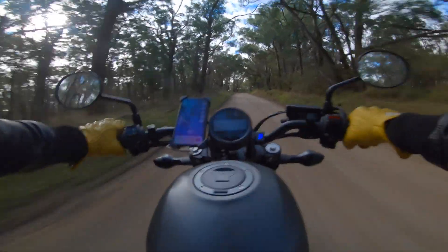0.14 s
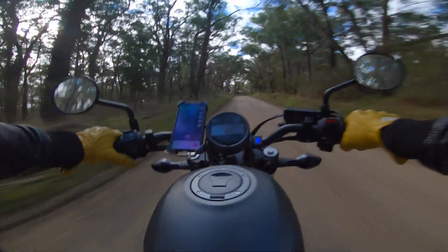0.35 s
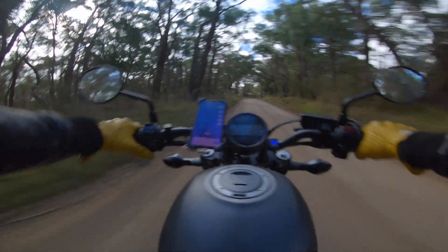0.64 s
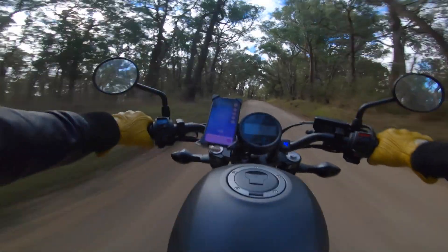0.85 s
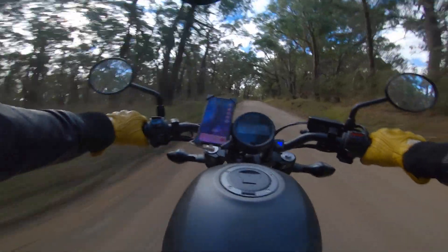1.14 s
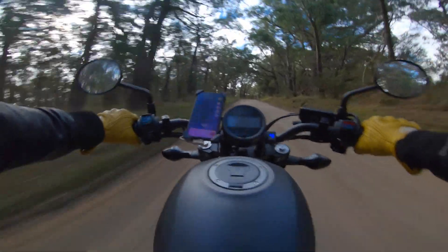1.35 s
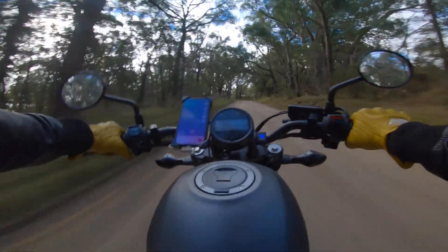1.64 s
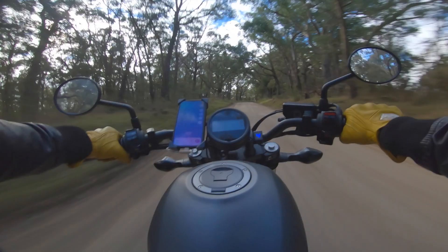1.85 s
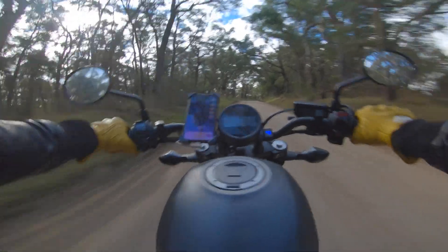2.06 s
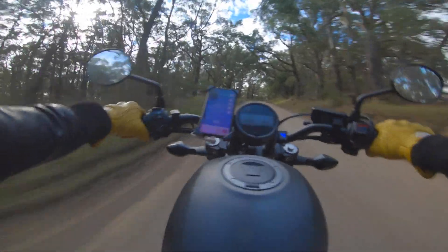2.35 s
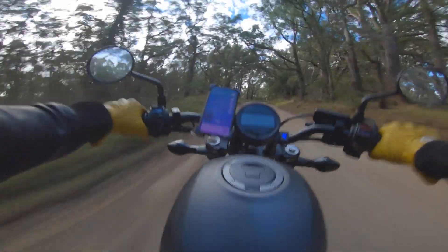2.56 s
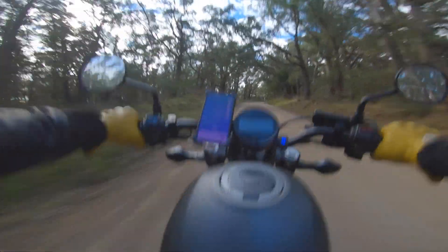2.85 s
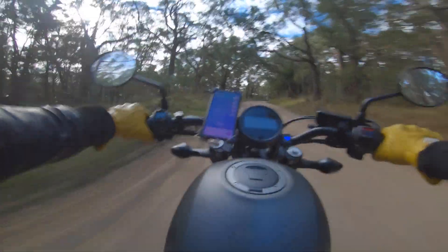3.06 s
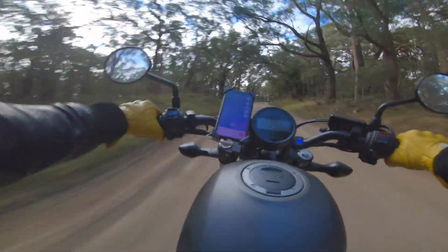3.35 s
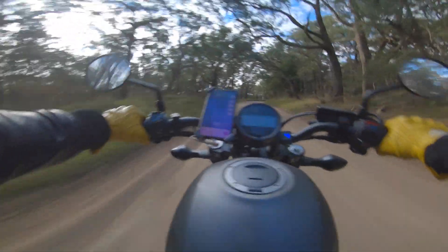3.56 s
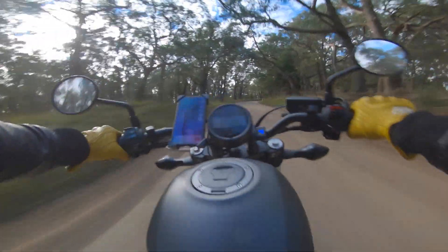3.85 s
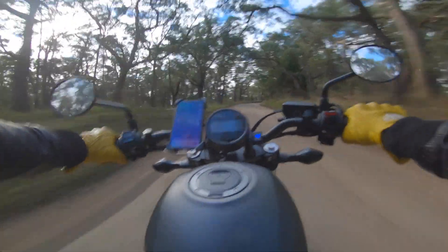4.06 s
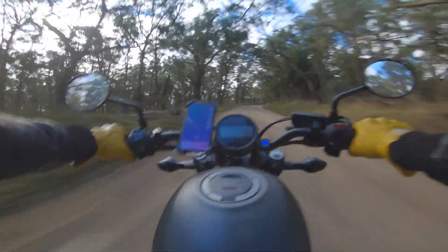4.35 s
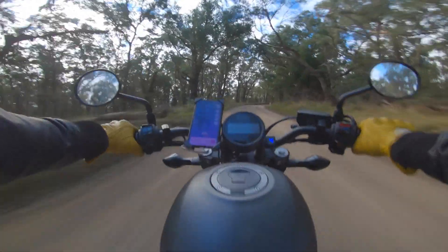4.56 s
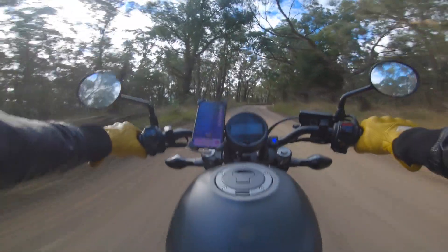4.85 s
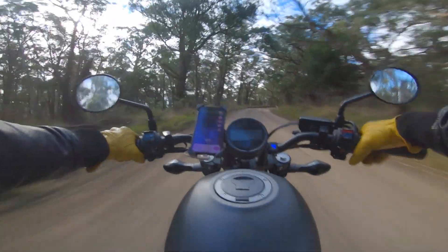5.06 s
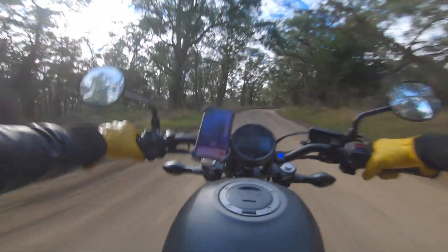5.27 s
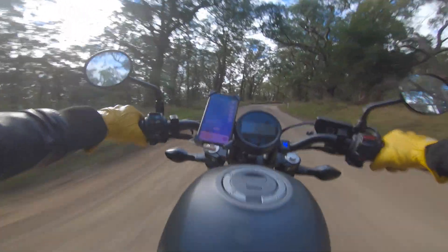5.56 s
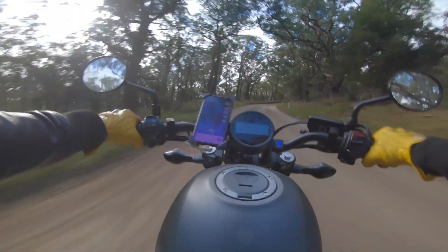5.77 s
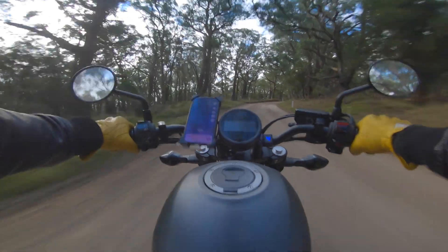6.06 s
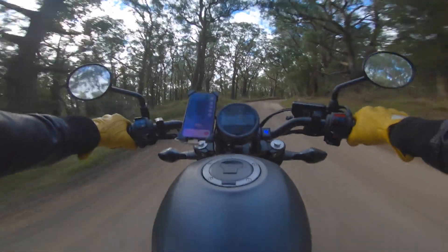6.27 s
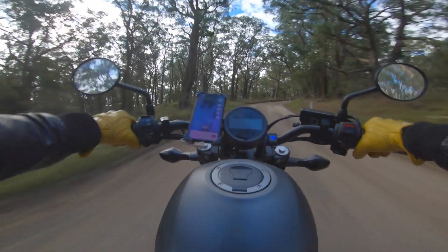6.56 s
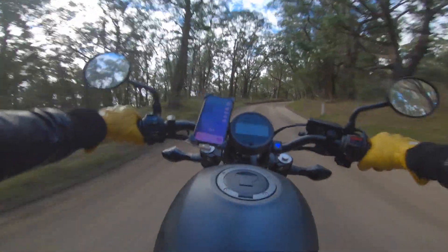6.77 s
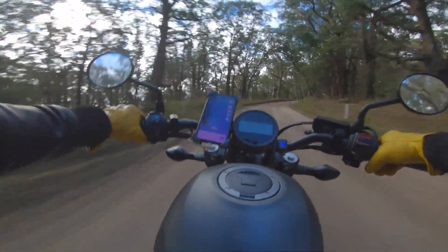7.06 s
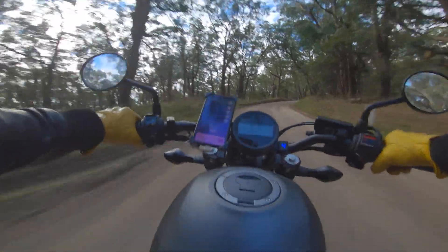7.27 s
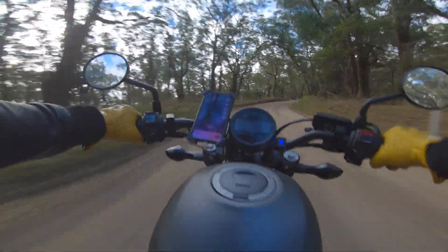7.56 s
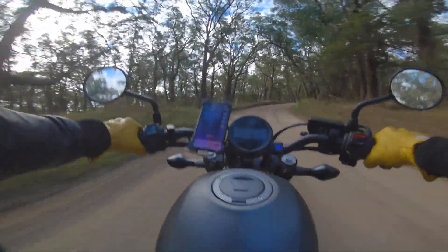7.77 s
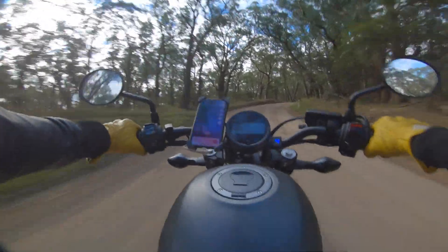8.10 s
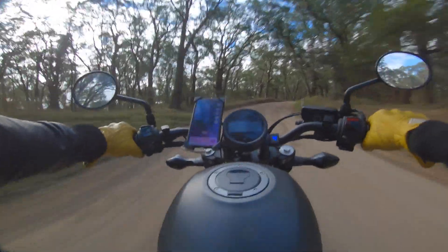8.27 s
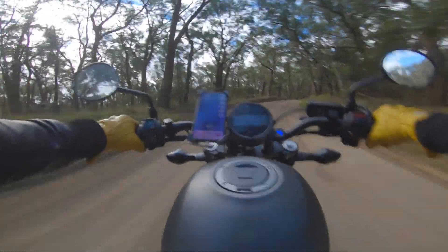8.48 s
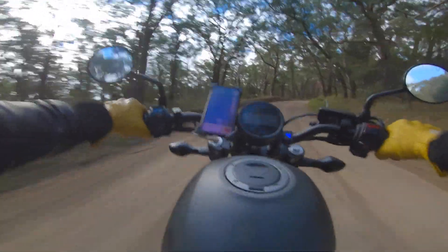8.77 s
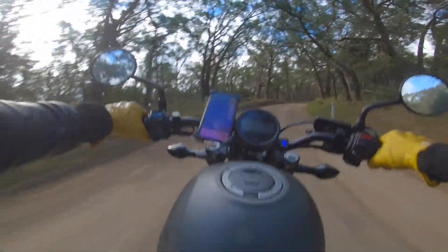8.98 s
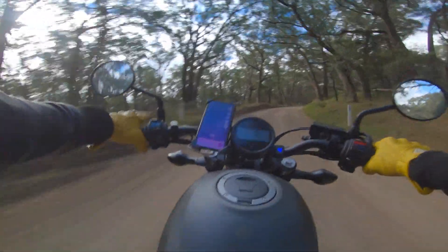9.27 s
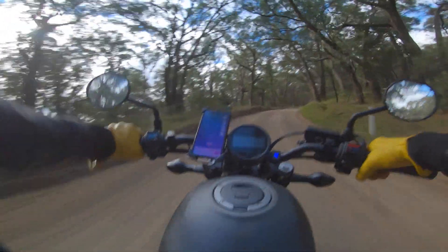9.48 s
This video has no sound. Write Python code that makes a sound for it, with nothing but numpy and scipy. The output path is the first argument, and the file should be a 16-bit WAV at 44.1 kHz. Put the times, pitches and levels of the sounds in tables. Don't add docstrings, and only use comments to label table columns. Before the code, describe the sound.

Deep, uneven engine pulsing heard from the rider's chest, buffeted by low gusts, grit rattling on the frame, the throttle closing again at the end.

```python
import sys
import numpy as np
from scipy import signal
from scipy.fft import rfft, irfft, next_fast_len
from scipy.io import wavfile
from scipy.ndimage import uniform_filter1d, minimum_filter1d

SR = 44100
rng = np.random.default_rng(int(sys.argv[2]) if len(sys.argv) > 2 else 0)


def gain_from_db(level_db):
    decades = np.asarray(level_db, float) / 20
    return 10 ** decades


def dump_mix(stems):
    frames = np.atleast_2d(stems).T
    limited = np.clip(frames, -1, 1)
    pcm = np.round(limited * 32767).astype(np.int16)
    wavfile.write(sys.argv[1], SR, pcm)


N = 425124
RUN_IN = SR // 2

# [t/s, rate/(cycles/s)]
SPIN = [(0.0, 17.561), (1.5, 18.727), (1.8, 19.281), (2.1, 19.2), (2.7, 19.84), (3.0, 19.733),
        (4.9, 21.044), (5.1, 19.13), (5.4, 19.83), (5.6, 19.043), (6.4, 19.012), (6.9, 18.544),
        (7.0, 16.256), (7.1, 18.019), (7.3, 16.239), (7.4, 18.561), (7.5, 16.665), (9.64, 16.103)]


def rms_one(x):
    return x / np.sqrt(np.mean(x ** 2) + 1e-20)


def in_time(rows, early=0):
    t_s, *columns = np.transpose(rows)
    now_s = np.arange(-early, N) / SR
    return [np.interp(now_s, t_s, column) for column in columns]


def bells(rows):
    now_s = np.arange(N) / SR
    return sum(height * np.exp(-((now_s - t_s) / half_s) ** 2) for t_s, half_s, height in rows)


def drift(rate_hz):
    r = np.exp(-80 * np.pi * rate_hz / SR)
    noise = rng.standard_normal(N // 40 + 2002)
    slow = signal.lfilter([1], [1, -2 * r, r * r], noise)[2000:]
    return np.interp(np.arange(N) / 40, np.arange(len(slow)), rms_one(slow))


def patchy_noise(colour, patchy_db, rate_hz):
    hz, db = np.transpose(colour)
    size = next_fast_len(N)
    grid_hz = np.maximum(np.arange(size // 2 + 1) * SR / size, 1)
    colour_db = np.interp(np.log(grid_hz), np.log(hz), db, left=-90, right=-120)
    noise = rfft(rng.standard_normal(size)) * gain_from_db(colour_db)
    out, together, octave = 0, drift(rate_hz / 2), np.log2(grid_hz)
    step_oct = .75
    for centre in np.arange(np.log2(hz[0]), np.log2(hz[-1]) + step_oct, step_oct):
        share = np.cos(np.pi / 2 * np.clip((octave - centre) / step_oct, -1, 1)) ** 2
        flicker_db = patchy_db * (0.33 * together + drift(rate_hz))
        out = out + irfft(noise * share, size)[:N] * gain_from_db(flicker_db)
    return rms_one(out)


def wind():
    # [f/Hz, density/dB]
    colour = [(18, -11), (30, -2.5), (50, -4.5), (80, -4), (130, -12), (200, -17.5), (300, -34), (450, -44),
              (700, -55)]
    # [t/s, peak level/dB]
    gust_rows = [(.1, -27.5), (.5, -29), (.8, -28), (1.13, -23), (1.45, -25.5), (1.77, -23.5), (2.33, -20),
                 (2.65, -20.5), (2.95, -26), (3.4, -19), (3.75, -23), (4.05, -22.5), (4.51, -29),
                 (4.94, -26.5), (5.1, -23), (5.3, -22.5), (5.56, -23.5), (5.8, -24), (6.09, -25),
                 (6.25, -20.5), (6.45, -25.5), (6.84, -24.5), (7.05, -23.5), (7.28, -23), (7.6, -30),
                 (7.9, -27), (8.1, -27), (8.4, -24), (9.2, -29.5), (9.53, -20.5)]
    half_s, lull_db, rumble_db = .07, -30.5, 5
    swells = bells([(t_s, half_s, gain_from_db(db) ** 2) for t_s, db in gust_rows])
    strength = np.sqrt(gain_from_db(lull_db) ** 2 + swells)
    return gain_from_db(rumble_db) * strength * patchy_noise(colour, patchy_db=2.2, rate_hz=4)


def stones():
    # [t/s, peak level/dB, dullness (low-mode gain)/dB]
    stone_rows = [(0.282, -41, -13), (1.179, -32.5, -6), (1.34, -50, -6.5), (1.388, -36, 6),
                  (1.877, -53, 5.5), (2.239, -54, 11), (3.046, -50, 13), (3.103, -56.5, 0.5),
                  (3.204, -50, -2.5), (3.35, -50, 11), (3.698, -61, 5.5), (3.746, -53, 25.5),
                  (4.424, -39, 4), (4.58, -59, 20), (4.867, -56, 2.5), (6.014, -45.5, -2),
                  (6.165, -49.5, 13), (6.186, -43, -4.5), (6.269, -43.5, 17.5), (7.388, -43.5, -1),
                  (7.444, -40, -18.5), (7.491, -39, -20), (7.567, -37, -19), (7.638, -39, -13),
                  (7.671, -55, -1), (7.819, -25, -1), (7.907, -35, -13), (8.851, -38.5, -10),
                  (9.17, -39.5, 4), (9.538, -57.5, -0.5)]
    # [t/s, level/dB]
    gravel = [(0, -63), (1.3, -62), (2.5, -70), (4.9, -55), (5.2, -69), (6.2, -48.5), (7.2, -53),
              (7.4, -46.5), (7.9, -45), (8.4, -59.5), (8.9, -49.5), (9.64, -54.5)]
    # [f/Hz, level/dB, t60/s]
    modes = [(330, 1, .025), (540, -1, .02), (720, -5, .02), (920, 0, .028), (1150, -5, .025),
             (1450, -11, .025)]
    lag_s, scatter_db, grit_per_s = .003, 3, 40.
    t_s, peak_db, dull_db = np.transpose(stone_rows)
    at = ((t_s + lag_s) * SR).astype(int)
    chance, out = rng.standard_normal((len(t_s), len(modes))), 0
    spread_db = 1.9 * np.minimum(rng.exponential(1, N), 2)
    grit = (rng.random(N) < grit_per_s / SR) * gain_from_db(in_time(gravel)[0] + spread_db)
    for k, (hz, db, t60_s) in enumerate(modes):
        clicks = grit * gain_from_db(db) * (hz > 800) + 1e-18
        clicks[at] = gain_from_db(peak_db + db - 6.5 + scatter_db * chance[:, k] + dull_db * (hz < 700))
        r, w = gain_from_db(-60 / (t60_s * SR)), 2 * np.pi * hz / SR
        out = out + signal.lfilter([0, np.sin(w)], [1, -2 * r * np.cos(w), r * r], clicks)
    return signal.sosfilt(signal.butter(6, 1600, fs=SR, output="sos"), out)


def jolts():
    # [t/s, half length/s, thump level/dB]
    ruts = [
        (0.135, .02, -41.5),
        (1.37, 0.033, -35),
        (2.708, .02, -40),
        (5.284, 0.021, -36.5),
        (6.029, 0.021, -32.5),
        (6.168, 0.014, -32.5),
        (6.278, 0.0096, -30),
        (7.082, 0.022, -40.5),
    ]
    # [t/s, half length/s, height/full scale]
    end_dips = [
        (0, .004, -.13),
        (9.64, .006, -.22),
    ]
    band = signal.butter(2, [204, 394], "band", fs=SR, output="sos")
    dull = signal.sosfilt(band, rng.standard_normal(N))
    dull = signal.sosfilt(signal.butter(2, 1200, fs=SR, output="sos"), dull)
    thumps = rms_one(dull) * bells([(t_s, half_s, gain_from_db(db)) for t_s, half_s, db in ruts])
    return thumps + bells(end_dips)


def throttle_shut(early=0):
    # [start/s, length/s, depth/(0-1)]
    roll_offs = [
        (0.989, 0.24, 0.1),
        (4.93, .42, .85),
        (6.393, 0.55, 0.3),
        (6.903, .42, .55),
        (8.302, 1, 0),
        (9.417, .4, 1),
    ]
    close_s, open_s = 0.14, 0.042
    now_s = np.arange(-early, N) / SR
    shut = 0
    for start_s, length_s, depth in roll_offs:
        closing = (now_s - start_s) / close_s
        opening = 1 + (start_s + length_s - now_s) / open_s
        shut = shut + depth * np.clip(np.minimum(closing, opening), 0, 1)
    return np.clip(shut, 0, 1)


def firings(lag, shut_lag, second, uneven_db, shut_uneven_db, jitter, wobble):
    per_s, = in_time(SPIN, RUN_IN)
    shut = throttle_shut(RUN_IN)
    cycle = np.cumsum(per_s) / SR
    cycle = cycle - cycle[RUN_IN] - .183
    clicks, count = np.zeros(len(cycle)), np.arange(np.ceil(cycle[0]), cycle[-1])
    chance = rng.standard_normal((len(count), 5))
    closed = np.interp(count, cycle, shut)
    widen = closed * (shut_lag - lag) / 2
    for k, (place, size) in enumerate([(count - widen, 1), (count + lag + widen, second)]):
        early_late = jitter * chance[:, k] + wobble * chance[:, 4]
        at = np.searchsorted(cycle, place + early_late)
        strength = size * gain_from_db((uneven_db + shut_uneven_db * closed) * chance[:, k + 2])
        inside = at < len(cycle)
        clicks[at[inside]] = strength[inside]
    return clicks


def gas_hiss(clicks, hiss_db, puff_s, steady):
    # [f/Hz, density/dB]
    colour = [(150, -8), (230, -0.5), (278, -14), (315, -6.5), (519, -20.5), (611, -22.5), (804, -26.5),
              (900, -28), (1010, -28.5), (1140, -26), (1310, -34), (1470, -33.5), (1600, -37), (4580, -71),
              (5950, -103), (10100, -120)]
    r = np.exp(-1 / (puff_s * SR))
    puffs = rms_one(signal.lfilter([1], [1, -2 * r, r * r], clicks)[RUN_IN:])
    hiss = rms_one(patchy_noise(colour, patchy_db=0.5, rate_hz=3.3) * (steady + puffs))
    dull = signal.sosfilt(signal.butter(1, 1500, fs=SR, output="sos"), hiss)
    return gain_from_db(hiss_db) * (hiss + throttle_shut() * (dull - hiss))


def evened(x):
    power = uniform_filter1d(uniform_filter1d(x ** 2, size=5000), size=5000)
    return (x / np.sqrt(power + 1e-20))[RUN_IN:]


def exhaust(clicks, levels_db, thud_db, thud_hz, bark_hz, rasp_hz):
    # [f/Hz, width/Hz, level/dB, signed weight]
    pipe_modes = [(71.6, 12.2, 7.2, 1), (60, 120, -7.7, 1), (158.7, 76, -.4, -1), (210.6, 24, -8.6, 1),
                  (272, 40, -8, -1),
                  (408, 86, -13.5, 1), (505, 77, -12, -0.81)]
    # [f/Hz, level/dB]
    tone = [(45, -11.5), (60, -1.5), (75, 1), (97, 2), (120, 3.5), (200, 3.5), (230, 3), (330, 1.5)]
    pulse_hz, mic_cut_hz = 40, 86.4
    size = next_fast_len(len(clicks))
    grid_hz = np.arange(size // 2 + 1) * SR / size
    s = 1j * grid_hz
    pipe = sum(sign * gain_from_db(db) * s * width / (s * s + s * width + hz * hz)
               for hz, width, db, sign in pipe_modes)
    bass_cut = s * s / (s * s + np.sqrt(2) * s * mic_cut_hz + mic_cut_hz ** 2)
    tone_hz, tone_db = np.transpose(tone)
    tone_gain = gain_from_db(np.interp(np.log(grid_hz + 1), np.log(tone_hz), tone_db))
    heard = rfft(clicks, size) * pipe * tone_gain * bass_cut ** 2 / (1 + s / pulse_hz) ** 2
    deep = 1 / (1 + (grid_hz / thud_hz) ** 16)
    low = 1 / (1 + (grid_hz / bark_hz) ** 8)
    mid = 1 / (1 + (grid_hz / rasp_hz) ** 8)
    thud, boom, bark, rasp = (irfft(heard * part, size)[:len(clicks)]
                              for part in (deep, low, mid - low, 1 - mid))
    boom = boom + throttle_shut(RUN_IN) ** 2 * gain_from_db(thud_db) * thud
    return sum(gain_from_db(db) * evened(part) for db, part in zip(levels_db, (boom, bark, rasp)))


def engine():
    # [t/s, boom level/dB, bite of the burn/dB, sharpness of the blow-down/dB]
    load = [(0, -6.5, 5.5, 3), (.45, -11, 6, 0), (.95, -13.5, 1.5, -2.5), (1.2, -12, 5, 1.5),
            (1.6, -8, 0, 3.5), (2.9, -11, -1, -1), (3.3, -12.5, 1.5, 0.5), (3.65, -9.5, -1, 2.5),
            (4.85, -10, -4, 1.5), (5.3, -15, 1, -1), (5.62, -7.5, 0, 3.5), (6.2, -12.5, 2.5, -4),
            (6.75, -9, 1.5, 1.5), (7.2, -13, -9.5, 3.5), (7.45, -9.5, 1, 0.5), (7.95, -10.5, 3.5, 2.5),
            (9.35, -11, -1, 0.5), (9.64, -10.5, -4, 1)]
    # [level at mean speed/dB, slope/(dB per cycle/s), change when shut/dB, bite share, sharpness share]
    layers = [
        (-18.5, 0, -9, 1, 0.024),
        (-39.5, 3, -6.5, 0.35, 0.47),
        (-52, -0.14, -3.5, 0.45, .6),
    ]
    boom_db, bite_db, sharp_db = in_time(load)
    faster = in_time(SPIN)[0] - 18.5
    shut = throttle_shut()
    bark_db, rasp_db, hiss_db = (db + slope * faster + shut_db * shut + bite * bite_db + sharp * sharp_db
                                 for db, slope, shut_db, bite, sharp in layers)
    clicks = firings(lag=.225, shut_lag=.28, second=.72, uneven_db=.7, shut_uneven_db=3,
                     jitter=.0025, wobble=.0025)
    pipe = exhaust(clicks, (boom_db - .5, bark_db - 6.0, rasp_db - 3.5),
                   thud_db=7.5, thud_hz=71.3, bark_hz=116.0, rasp_hz=214.6)
    return pipe + gas_hiss(clicks, hiss_db + 10, puff_s=0.013, steady=0.99)


def scene():
    return (wind() + stones() + jolts() + engine())[None]


def limiter(x, top):
    room = minimum_filter1d(np.minimum(1, top / (np.abs(x) + 1e-9)), size=900)
    return x * uniform_filter1d(uniform_filter1d(room, size=450), size=450)


def roll_off(x):
    return signal.sosfilt(signal.butter(12, 16200, fs=SR, output="sos"), x)


def record(dry):
    at = round(1.71652 * SR)
    snap_db, recover_s, converter_db = -3.5, 0.0015, -99
    recovery = gain_from_db(snap_db) * np.exp(-np.arange(N - at) / SR / recover_s)
    snap = np.concatenate([np.zeros(at), recovery])
    mix = limiter(dry, top=.815) + snap + gain_from_db(converter_db) * rng.standard_normal(N)
    return roll_off(mix)


dry = scene()
out = record(dry)
dump_mix(out)
```